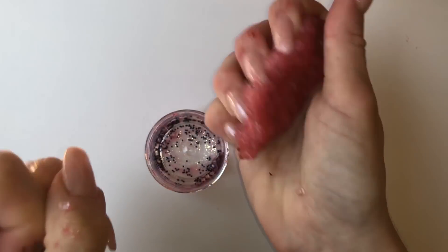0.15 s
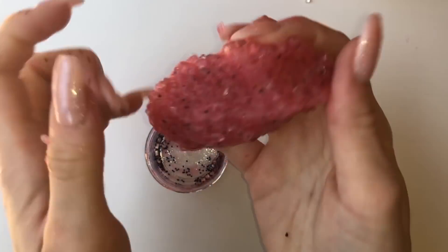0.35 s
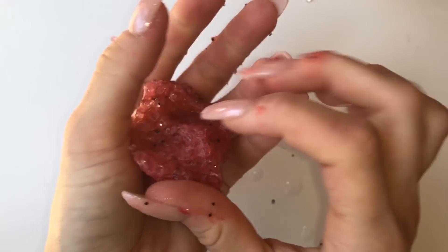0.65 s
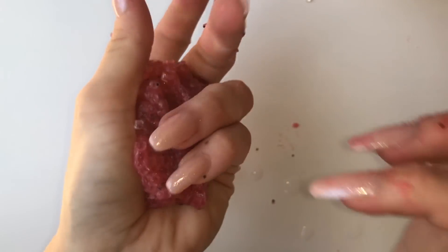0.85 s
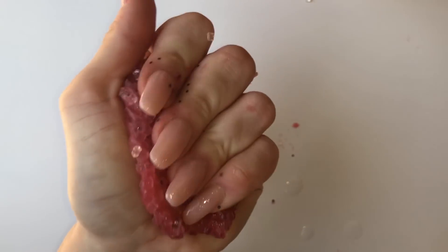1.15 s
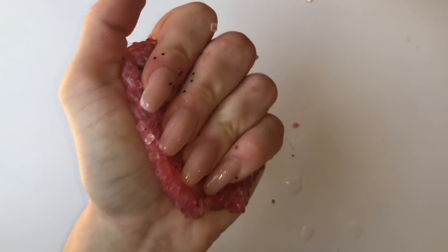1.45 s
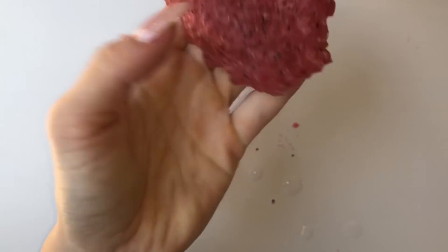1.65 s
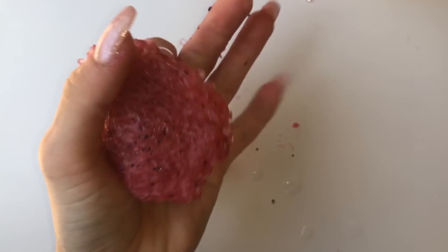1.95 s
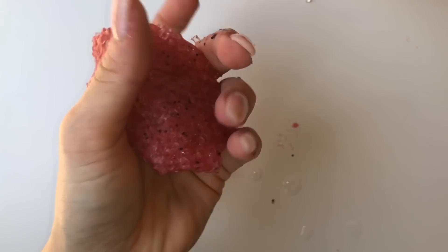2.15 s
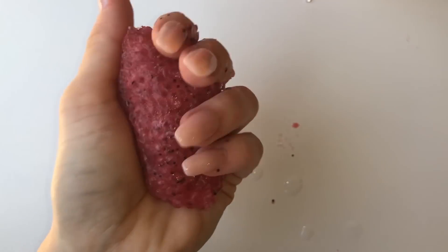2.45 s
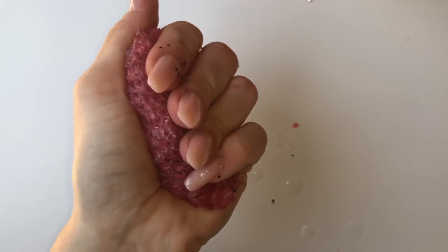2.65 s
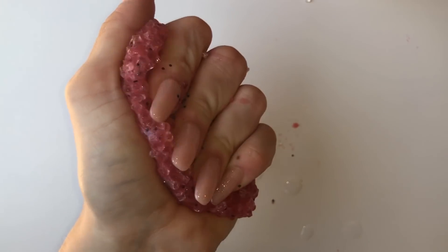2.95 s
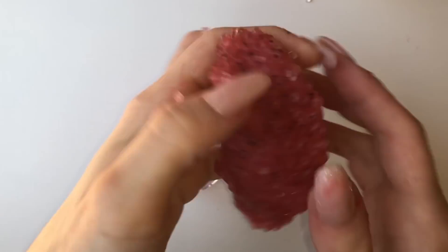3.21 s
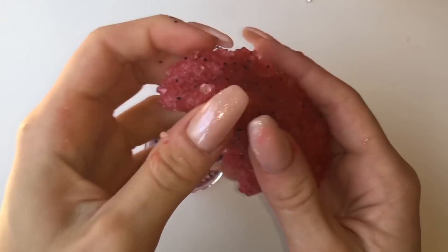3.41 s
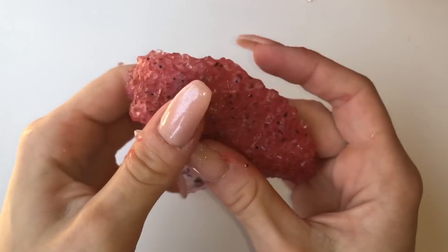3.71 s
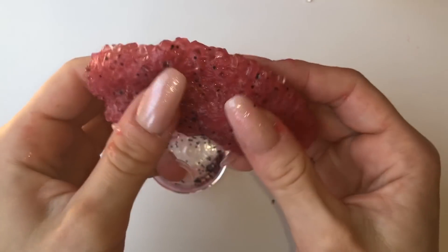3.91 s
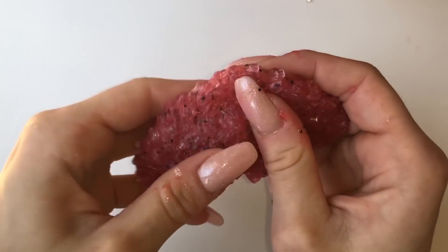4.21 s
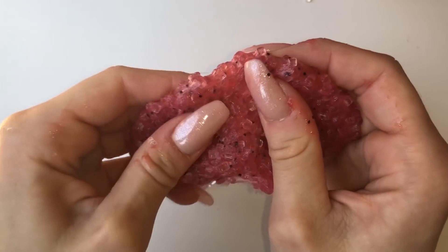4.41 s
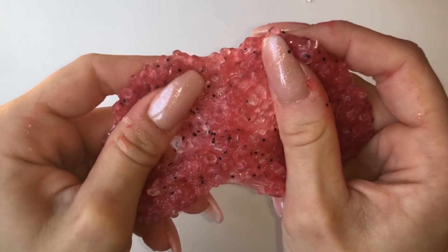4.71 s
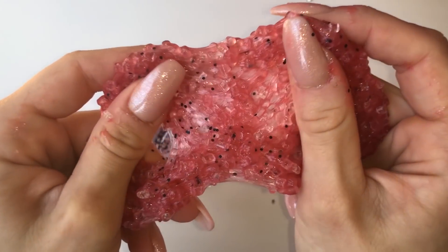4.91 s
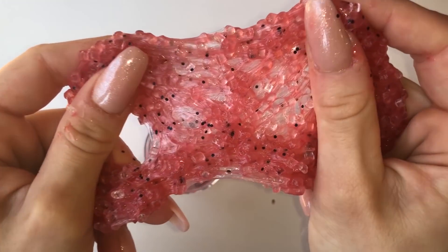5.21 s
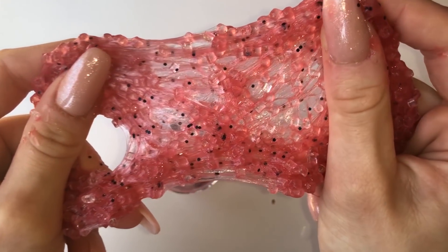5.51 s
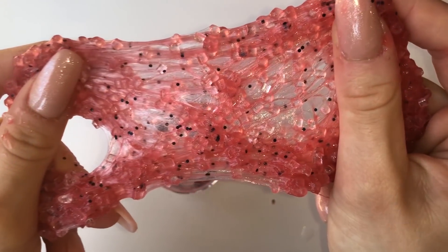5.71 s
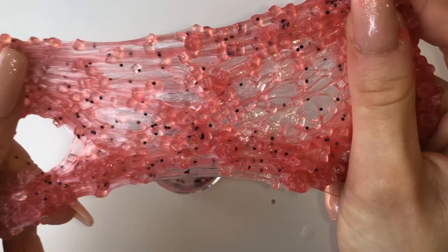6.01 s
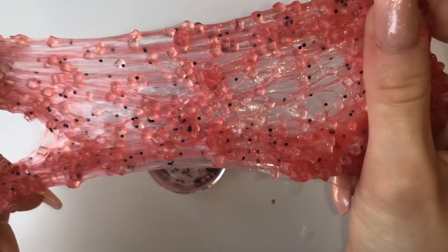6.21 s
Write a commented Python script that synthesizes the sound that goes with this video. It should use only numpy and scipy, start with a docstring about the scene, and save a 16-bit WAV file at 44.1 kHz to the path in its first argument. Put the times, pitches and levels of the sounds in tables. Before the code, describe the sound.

Close-up bead slime in a quiet room with slight short echoes. At the start a squeeze gives sharp bright pops and crackle; at 0.26 s the slime tears off the palm in a loud sticky fizz. Scattered snaps follow around 0.5-0.95 s, then a dense firm squeeze from 1.0 to 1.5 s, full of crisp pops. At 1.64 s it peels with a wet squelch and fizz, with smaller peels at 1.9-2.3 s. A softer squeeze crackles from 2.5 to 3.1 s, topped by a very loud pop with a dull thud at 3.04 s. Sticky rips come at 3.2 s, then light handling. From 4.4 to 4.8 s stretching surges in crackles and pops, thinning to sparse ticks until 6.4 s. Very faintly outside, a songbird whistles from 1.8 s on, a dove coos around 3 and 6 s, and a low drone swells near 5.5-6.4 s over soft air and hum.

```python
"""In a quiet room a hand squeezes, peels and stretches slime full of small beads, heard from close by.
Trapped air bursts in pops, faint to very loud (ringing cavities); a sticky crackle of countless tiny breaks
thickens to a tearing fizz when the palm lets go. Short zips and wet, sliding squelches lie between.
The room adds soft air noise, a wavering hum and a few echoes. Very faintly outside, a songbird whistles,
a dove coos and a low drone swells: gliding tones, the birds with echoes from a yard."""
import sys
import numpy as np
from scipy import signal
from scipy.fft import rfft, irfft
from scipy.io import wavfile
from scipy.ndimage import uniform_filter1d

SR = 44100
rng = np.random.default_rng(int(sys.argv[2]) if len(sys.argv) > 2 else 0)


def inscribe(sig):
    """Save sig as 16-bit PCM at rate SR to the path in sys.argv[1].

    A 1-D sig is mono; a 2-D sig holds one channel per row.
    Samples are clipped to [-1, 1] before scaling.
    """
    pcm = np.round(np.clip(np.atleast_2d(sig).T, -1, 1) * 32767)
    wavfile.write(sys.argv[1], SR, pcm.astype(np.int16))


N = 280476  # length of the scene [samples]

EDGE_HZ = 16300  # upper end of the treble
LEAD_S = .0012  # how long the skin of a pocket tears before it bursts
REST_DB = -79  # fine crackle of slime that only lies in the hand
USUAL_DB = -55  # fine crackle of a firm squeeze, the reference for how hard the slime is worked


def gain_of(db):
    """Turns decibels into an amplitude factor."""
    return 10 ** (np.asarray(db) / 20)


def evened(x):
    """Scales a sound to an rms (average strength) of one."""
    return x / np.sqrt(np.mean(x ** 2) + 1e-20)


def read(points, hz):
    """Reads a table over frequency, with straight lines between its points on a logarithmic axis."""
    f, value = np.transpose(points)
    return np.interp(np.log(hz + 1), np.log(f), value)


def add(mix, s, sound):
    """Mixes a sound in at time s."""
    part = mix[max(round(s * SR), 0):][:len(sound)]
    part += sound[:len(part)]


def coloured(x, points):
    """Filters x with the tone colour given by a table."""
    gain = gain_of(read(points, np.fft.rfftfreq(N, 1 / SR)))
    return irfft(rfft(x) * gain, N)


def lowpassed(x, hz):
    """Weakens what lies above hz, with a gentle slope."""
    return signal.sosfilt(signal.butter(2, hz, fs=SR, output="sos"), x)


def resonance(f, hz, q):
    """Response of one damped resonance at the frequencies f; a high q rings long."""
    damping = 1j * f * hz / q
    return damping / (hz ** 2 - f ** 2 + damping)


def resonate(x, hz, width_hz):
    """A resonance that follows the curve hz: shift down to zero, smooth twice, shift back."""
    turn = np.exp(2j * np.pi * np.cumsum(hz) / SR)
    r = np.exp(-np.pi * width_hz / SR)
    smooth = signal.lfilter([1], np.poly([r, r]), x / turn)
    return (turn * smooth).real


def glides(rows, width_hz, pure, per_s, bend=1):
    """Notes that slide in pitch: a share of pure tone, the rest tiny impulses in a moving resonance."""
    out, pure = np.zeros(N), np.clip(pure, 0, 1)
    for s, length, first_hz, last_hz, db in rows:
        n = int(length * SR)
        # a bend below one moves fastest at the start
        hz = first_hz * (last_hz / first_hz) ** np.linspace(0, 1, n) ** bend
        impulses = (rng.standard_normal(2 * SR) * (rng.random(2 * SR) < per_s / SR))[:n]
        tone = evened(np.sin(2 * np.pi * np.cumsum(hz) / SR))
        rough = evened(resonate(impulses, hz, width_hz))
        note = pure * tone + (1 - pure) * rough
        add(out, s, gain_of(db) * evened(note * signal.windows.tukey(n, .5)))
    return out


def echoes(t60, start_s, length_s):
    """Sparse reflections of random sign, each band dying at its own speed; total energy one."""
    t = np.arange(int(length_s * SR)) / SR
    taps = rng.choice([-1., 1.], len(t)) * (rng.random(len(t)) < .1)
    hz, age, z = signal.stft(taps, SR, nperseg=256)
    fade = gain_of(-60 * age / read(t60, hz)[:, None])
    tail = signal.istft(z * fade, SR, nperseg=256)[1][:len(t)]
    tail *= t > start_s
    return tail / np.linalg.norm(tail)


def from_afar(x, t60, direct_db):
    """Distant calls arrive partly straight, partly as echoes from the yard."""
    return gain_of(direct_db) * x + signal.oaconvolve(x, echoes([(1000, t60)], 0, 1))[:N]


def room_tone(air_db=-62.5):
    """Soft air noise, and a hum that wavers because it is noise in a very narrow resonance."""
    # colour of the still air: (frequency [Hz], relative level [dB])
    air_colour = [(20, -63), (38, -6.5), (70, 1), (110, -0.5), (200, -4), (360, -11.5), (600, -13),
                  (1300, -20), (2500, -23.5), (4200, -20.5), (8000, -28.5), (16000, -32.5)]
    # hum: (frequency [Hz], width of the resonance, which is applied twice [Hz], level [dB])
    hums = [(100.6, 4.7, -69), (123.6, 8.5, -75.5)]
    f = np.fft.rfftfreq(N, 1 / SR)
    out = gain_of(air_db) * evened(coloured(rng.standard_normal(N), air_colour))
    for hz, width, db in hums:
        hum = irfft(rfft(rng.standard_normal(N)) * resonance(f, hz, hz / width) ** 2, N)
        out += gain_of(db) * evened(hum)
    return out


def far_drone():
    """A low drone far away swells for a while: part pure tone, part noise-like ringing."""
    # (time [s], length [s], first pitch [Hz], last pitch [Hz], level [dB])
    swells = [(5.4, 1.08, 116, 125.1, -67.5)]
    return glides(swells, width_hz=30, pure=.3, per_s=5000)


def coos(clear_hz=470, hoarse_hz=570, flutter_hz=62, swing_hz=48, jitter=0.22, size=300):
    """The low notes of the dove are clear; in the high, stressed ones the throat flutters and turns hoarse."""
    # (time [s], length [s], first pitch [Hz], last pitch [Hz], level before the yard [dB])
    coo_notes = [(2.83, 0.1, 446, 464, -77), (3.02, .21, 440, 478, -70.5), (3.25, 0.15, 622, 631, -65),
                 (3.45, 0.11, 675, 585, -64.5), (3.56, .16, 458, 437, -79), (5.62, 0.15, 432, 476, -76),
                 (5.84, 0.14, 446.7, 464, -68.5), (6.03, 0.14, 565, 622, -63), (6.25, 0.1, 610, 665, -63.5)]
    out = np.zeros(N)
    for s, length, first_hz, last_hz, db in coo_notes:
        n = int(length * SR)
        hoarse = np.interp(first_hz, [clear_hz, hoarse_hz], [0, 1])
        unsteady = evened(uniform_filter1d(rng.standard_normal(SR), size))[:n]
        flutter = np.sin(2 * np.pi * np.cumsum(flutter_hz * (1 + jitter * unsteady)) / SR)
        hz = np.geomspace(first_hz, last_hz, n)
        hz = hz + hoarse * swing_hz * flutter + swing_hz * jitter * unsteady
        note = np.sin(2 * np.pi * np.cumsum(hz) / SR) * signal.windows.tukey(n, .5)
        add(out, s, gain_of(db) * evened(note))
    return out


def whistles():
    """Each whistle of the songbird drops quickly and levels out; a wall across the yard repeats it."""
    # (time [s], length [s], first pitch [Hz], last pitch [Hz], level before the yard [dB])
    whistle_notes = [(1.79, 0.089, 3570, 3310, -67.5), (2.07, .07, 3760, 3420, -68),
                     (2.19, 0.043, 5200, 4700, -71), (2.21, .19, 4600, 3760, -64),
                     (2.40, 0.1, 4780, 3230, -65), (3.60, 0.16, 4040, 3360, -65.5),
                     (3.90, .19, 3540, 3450, -63.5), (4.87, .11, 4100, 3050, -67.5),
                     (5.09, 0.13, 4140, 3820, -66.5), (5.21, .17, 3665, 3150, -65),
                     (5.48, .09, 4530, 4010, -66), (5.52, 0.12, 3800, 3510, -70),
                     (5.72, 0.08, 4750, 4120, -68), (5.885, .12, 4790, 3120, -68),
                     (6.15, .18, 3840, 3365, -67.5)]
    # the wall: (delay [s], level [dB])
    delay_s, db = 0.052, -11.5
    song = glides(whistle_notes, width_hz=560, pure=.52, per_s=5000, bend=.65)
    out = song.copy()
    add(out, delay_s, gain_of(db) * song)
    return out


def squelches():
    """Wet folds whose hollow changes size under the fingers: impulses in a sliding resonance."""
    # (time [s], length [s], first pitch [Hz], last pitch [Hz], level [dB])
    folds = [(.52, 0.099, 855, 980, -67), (1.61, 0.12, 1150, 1060, -60.5), (1.61, 0.066, 3630, 2700, -51),
             (1.98, .08, 1190, 1030, -63.5), (2.15, 0.064, 2500, 2430, -62.5),
             (2.52, 0.22, 2180, 1430, -60.5), (2.68, 0.37, 1400, 980, -65.5), (3.75, 1.04, 1380, 1520, -68)]
    return glides(folds, width_hz=390, pure=0, per_s=420)


def burst(hz, q, low_hz, size=1024):
    """One cavity snaps open and rings briefly; being small, it radiates little bass. Energy one."""
    f = np.fft.rfftfreq(size, 1 / SR)
    bass_loss = (1j * f / (low_hz + 1j * f)) ** 2
    treble_loss = 1 + 1j * (f / EDGE_HZ) ** 20
    ring = irfft(resonance(f, hz, max(q, .3)) * bass_loss / treble_loss)
    return np.roll(ring, 8) / np.linalg.norm(ring)


def off_hands(sound, scatter_db=-12, delay_s=0.0006, fade_s=0.0032, size=400):
    """Palm, fingers and table scatter a burst within a few milliseconds, differently every time."""
    t = np.arange(size) / SR
    scatter = evened(rng.standard_normal(size) * np.exp(-t / fade_s) * (t > delay_s))
    path = scatter * gain_of(scatter_db) / np.sqrt(size)
    path[0] = 1  # the direct sound
    return signal.fftconvolve(sound, path)


def summed(moves):
    """Levels [dB] of fine crackle and deep pockets, summed over moves (shape, fine, deep, all in dB)."""
    shapes, fine, deep = zip(*moves)
    power = gain_of([fine, deep]) ** 2 @ gain_of(np.maximum(shapes, -100)) ** 2
    return 10 * np.log10(power)


def pressing(grip_db_per_s=171, let_go_db_per_s=259, stretch_deep_db=-5):
    """How hard the lump is squeezed or stretched; the grip builds steadily and lets go quickly."""
    # the fingers close and keep pressing:
    # (time of full grip [s], hold [s], fine crackle [dB], deep pockets [dB])
    squeezes = [(0.0, 0.084, -54, -58), (0.55, 0.06, -55, -62.5), (.85, .1, -60, -63.5),
                (0.976, .51, -54.5, -56), (2.59, 0.53, -57, -59.5)]
    # both hands pull the lump into a sheet, which yields and then thins: (time [s], fine crackle [dB])
    stretch = [(3.551, -73), (3.852, -71.5), (3.913, -63), (4.33, -65), (4.41, -54), (4.551, -47),
               (4.79, -54.5), (4.852, -60.5), (5.351, -62), (5.449, -68), (6.36, -67)]
    t = np.arange(N) / SR
    pull_s, pull_db = np.transpose(stretch)
    pull = np.interp(t, pull_s, pull_db, left=-np.inf)
    moves = [(np.zeros(N), REST_DB, -np.inf), (pull, 0, stretch_deep_db)]
    for s, hold, fine, deep in squeezes:
        closing = grip_db_per_s * (t - s)
        opening = let_go_db_per_s * (s + hold - t)
        moves.append((np.minimum(np.minimum(closing, opening), 0), fine, deep))
    return summed(moves)


def peeling(rise_db_per_s=385, hold_s=0.0092):
    """How fast the slime tears off the skin: a quick rise, a short hold, then a dying away."""
    # (time of the fastest tearing [s], fine crackle [dB], deep pockets [dB], dying away [dB per s]);
    # crackle() shifts both levels by its fine_db and deep_db
    peels = [(0.262, -37, -45, 195), (0.393, -56.5, -61, 225), (1.636, -40.5, -50, 120.5),
             (1.921, -56.5, -60, 402), (2.025, -48.5, -56.5, 229), (2.171, -57.5, -58.5, 300),
             (2.335, -62, -88, 152), (3.195, -47.5, -65, 203), (3.224, -45, -48.5, 90),
             (3.391, -56.5, -59, 125), (3.71, -62, -63, 206), (4.15, -58, -64, 114),
             (4.325, -58, -63, 247.5), (6.116, -62.5, -60.5, 131)]
    t = np.arange(N) / SR
    moves = []
    for s, fine, deep, dying in peels:
        rising = rise_db_per_s * (t - s + hold_s)
        falling = dying * (s + hold_s - t)
        moves.append((np.minimum(np.minimum(rising, falling), 0), fine, deep))
    return summed(moves)


def crackle(work_db, pockets_db, per_s, spread_db, clump_db, scatter_db, fine_db, deep_db,
            thickening=1.05, dull_hz=8000, dulling=0.26, split_hz=3200, soft_db=-1, soft_s=0.003,
            count=40, size=180):
    """Countless tiny bubbles and threads break; the harder the slime is worked, the closer they crowd."""
    # tone colour of the crackle: (frequency [Hz], relative level [dB])
    crackle_colour = [(100, -20), (220, 9.5), (550, -3.5), (950, 0.5), (1450, 0.5), (2000, -4.5),
                      (2650, -6.5), (3000, -4), (5600, -4), (11500, -10), (16000, -17)]
    # sharpness of the ring: (dullest bubble [Q], most ringing bubble [Q]), before large ones are damped
    grain_q = .8, 6
    # per_s holds for work at USUAL_DB
    rate = per_s * gain_of(thickening * (np.maximum(work_db, REST_DB) - USUAL_DB))
    # little avalanches: breaks close in time share a strength, for size samples on average
    avalanche = np.cumsum(rng.random(N) < 1 / size)
    size_db = clump_db * np.clip(rng.standard_normal(N), -2, 2)[avalanche]
    size_db += spread_db * np.minimum(rng.exponential(1, N), 3)
    happens = rng.choice([-1, 1], N) * (rng.random(N) < rate / SR)
    # more breaks are each made weaker, so that the level stays with work_db
    breaks = gain_of(size_db) * happens / np.sqrt(np.minimum(rate, SR))
    kind = rng.integers(0, count, N)
    grains = np.zeros(N)
    for k, hz in enumerate(np.geomspace(900, 15000, count)):
        sharpness = np.exp(rng.uniform(*np.log(grain_q)))
        sharpness *= min(1, hz / split_hz)  # large soft pockets hardly ring
        grain = off_hands(burst(hz, sharpness, 117), scatter_db=scatter_db) * np.sqrt(hz)
        grains += signal.oaconvolve(breaks * (kind == k), grain)[:N]
    grains = coloured(grains, crackle_colour)
    low = signal.sosfilt(signal.butter(3, split_hz, "low", fs=SR, output="sos"), grains)
    high = signal.sosfilt(signal.butter(3, split_hz, "high", fs=SR, output="sos"), grains)
    # deep pockets go on oozing for a few milliseconds after they break
    oozing = np.sqrt(signal.lfilter([1], [1, -np.exp(-1 / (soft_s * SR))], low ** 2))
    wet_band = signal.butter(2, [560, split_hz], "band", fs=SR, output="sos")
    wet = signal.sosfilt(wet_band, oozing * rng.standard_normal(N))
    deep = evened(evened(low) + gain_of(soft_db) * evened(wet))
    # gentle work breaks things softly: the top of the treble drops away
    body = signal.sosfiltfilt(signal.butter(2, min(dull_hz, EDGE_HZ), fs=SR, output="sos"), high)
    top_gain = gain_of(dulling * np.clip(work_db - USUAL_DB, -20, 0))
    fine = (body + (high - body) * top_gain) / np.std(high)
    return gain_of(work_db + fine_db) * fine + gain_of(pockets_db + deep_db) * deep


def zips(q=0.7, low_hz=2000):
    """A patch of slime unsticks in one tiny zip: dense snaps of its threads that fade within milliseconds."""
    # (time [s], energy before scattering off the hands [dB], pitch [Hz], length [s])
    patches = [(.5185, -26, 7440, 0.0031), (.767, -14.5, 10700, 0.0047), (1.908, -25.5, 6000, 0.012),
               (2.1755, -18.5, 10000, .002), (2.539, -14.5, 6900, 0.0016), (3.227, -11.5, 3520, 0.0081)]
    out = np.zeros(N)
    for s, db, hz, length in patches:
        fade = np.linspace(1, 0, int(length * SR))
        threads = fade * rng.standard_normal(SR)[:len(fade)]
        snaps = signal.fftconvolve(threads, burst(hz, q, low_hz))
        add(out, s, gain_of(db) * off_hands(snaps / np.linalg.norm(snaps)))
    return out


def pop(hz, q, low_hz=1200, rip_db=-5, top_ratio=2.16, lead_db=-19):
    """One air pocket: the skin rips for an instant, and the cavity rings."""
    ripped = off_hands(burst(hz, q, low_hz), scatter_db=rip_db, delay_s=0, fade_s=0.00018)
    # a wider pocket opens more slowly and lacks the highest treble
    ripped = lowpassed(ripped, min(top_ratio * hz, .45 * SR))
    # the skin starts to tear just before it gives way
    growing = np.linspace(0, 1, round(LEAD_S * SR))
    tear = np.diff(growing * rng.standard_normal(len(growing)), prepend=0)
    lead = gain_of(lead_db) * evened(tear) / np.sqrt(len(tear))
    whole = np.concatenate([lead, ripped / np.linalg.norm(ripped)])
    return off_hands(whole, scatter_db=-11, fade_s=0.0017)


def faint_pops(work_db, per_s=40, thickening=.7, level_db=-28, growth=0.98, spread_db=0.5,
               middle_hz=5600, spread_octaves=0.65, usual_q=3.2, count=200):
    """Further faint pockets burst, sooner and louder with the pressure, up to that of a firm squeeze."""
    pressure_db = np.minimum(work_db - USUAL_DB, 0)
    # strain adds up; each pocket bursts once it reaches the pocket's own limit
    strain = np.cumsum(per_s * gain_of(thickening * pressure_db)) / SR
    wait, strength, pitch, ring = rng.uniform(-1.1, 1, (count, 4)).T
    out = np.zeros(N)
    for k, at in enumerate(np.searchsorted(strain, np.arange(count) + 1 + wait)):
        if at < N:
            db = level_db + growth * pressure_db[at] + 2 * spread_db * strength[k]
            hz = middle_hz * 2 ** (2 * spread_octaves * pitch[k])
            add(out, at / SR, gain_of(db) * pop(hz, usual_q * np.exp(ring[k])))
    return out


def pops(thud_q=2):
    """Air pockets burst, from faint to very loud; two bursts also have a dull thud."""
    # (time [s], energy before the last scattering [dB], pitch of the cavity [Hz],
    #  sharpness of its ring [Q], at least 0.3 in burst())
    pockets = [(0.014, -16, 9000, 0.26), (0.0203, -21.5, 3720, 0.88), (.025, -11, 4740, .17),
               (0.0602, -13.5, 13400, .73), (.088, -17, 6060, 3.2), (0.1154, -20.5, 3520, 1.9),
               (.1565, -23.5, 12100, .26), (0.2054, -22, 7200, 0.97), (0.235, -11.5, 10500, 0.55),
               (0.4772, -35, 7000, 1.4), (0.5915, -26.5, 6900, 2.1), (.6696, -14, 12200, 7.4),
               (0.656, -29, 6800, 8), (.683, -18, 6600, 0.97), (0.705, -32, 7100, 4),
               (.7384, -25, 2850, 10), (.8152, -9, 7500, 0.61), (.9107, -26, 7260, 2.2),
               (0.922, -22.5, 7500, 0.8), (0.9496, -23, 9800, 1.7), (0.9915, -16.5, 5500, 0.65),
               (0.9976, -14, 12170, 2.8), (1.0137, -11, 5500, 1.2), (1.037, -17, 7400, 0.95),
               (1.057, -18, 12400, 2.2), (1.081, -14, 5900, 0.24), (1.1287, -12, 9200, 1.2),
               (1.146, -23, 6000, .8), (1.1683, -19.5, 3240, 0.68), (1.186, -9.5, 12300, 2.2),
               (1.1916, -16.5, 9300, .71), (1.2122, -20, 4600, 2.7), (1.2327, -23, 4400, 1.5),
               (1.2543, -7, 8850, 0.81), (1.2886, -20, 5960, 0.89), (1.3278, -17.5, 9700, 0.4),
               (1.3615, -24.5, 4500, 5.5), (1.4292, -19, 5330, 1.2), (1.442, -25, 11000, 1),
               (1.4724, -5.5, 11500, 0.37), (1.488, -25, 8500, .91), (1.5171, -26.5, 14000, 0.55),
               (1.833, -20.5, 12600, 1.1), (1.88, -27.5, 9700, 0.87), (2.1276, -32, 6740, 2.4),
               (2.505, -28, 8460, 1.8), (2.534, -33, 8000, 0.92), (2.5511, -19.5, 8800, 3.6),
               (2.6259, -18, 10120, 4.2), (2.6502, -20.5, 12000, 0.71), (2.6762, -19.5, 6530, 3.4),
               (2.7028, -25.5, 5700, .5), (2.8021, -18.5, 7560, 2.7), (2.9207, -24, 13900, 2.4),
               (3.006, -13.5, 7000, 0.25), (3.012, -11.5, 4600, 2.4), (3.0398, 5, 4850, 0.57),
               (3.042, -13, 9000, 0.35), (3.1335, -19, 10800, 1.9), (3.2095, -15.5, 6600, 3.7),
               (3.354, -22, 8100, 2), (3.712, -23.5, 5300, 0.71), (3.8189, -31, 5860, 1.48),
               (4.1503, -17, 11500, 0.45), (4.2519, -29.5, 5040, 1.1), (4.3194, -21, 6040, 0.87),
               (4.371, -22, 6200, 1.5), (4.394, -19.5, 6550, 1.4), (4.4197, -18, 9000, 1.1),
               (4.432, -10, 7800, 1.6), (4.451, -16.5, 8700, 0.86), (4.5245, -19, 6100, 2.1),
               (4.5631, -6.5, 5950, 1.6), (4.661, -17.5, 5700, 2.5), (4.7337, -19.5, 5800, 3.2),
               (4.9087, -29, 9000, 2.1), (4.961, -28, 7400, 0.64), (5.01, -24, 8870, 0.65),
               (5.095, -23.5, 5900, 5.8), (5.1368, -13, 6960, 0.2), (5.4805, -31.5, 6400, 4.5),
               (5.666, -29.5, 8200, 6.7), (5.716, -34, 8350, 6.5), (5.9574, -30.5, 5310, 0.73),
               (6.2858, -29.5, 11900, 0.97)]
    # thuds: (time [s], energy [dB], pitch [Hz])
    thuds = [(3.04, -30, 250), (3.0398, -8.5, 1330), (4.432, -23, 283)]
    out = np.zeros(N)
    for s, db, hz, q in pockets:
        add(out, s - LEAD_S, gain_of(db) * pop(hz, q))
    for s, db, hz in thuds:
        add(out, s, gain_of(db) * burst(hz, thud_q, hz / 2))
    return out


def scene(room_db=-16.5):
    """Close slime with a little of the room, and the distant birds and drone."""
    # ring of the room: (frequency [Hz], time to fall by 60 dB [s])
    room_ring = [(300, 0.28), (2000, 0.088), (6000, 0.13), (10000, 0.17), (15000, 0.12)]
    work_db, pockets_db = pressing()
    crunch = crackle(work_db, pockets_db, per_s=750, spread_db=3.5, clump_db=2.5, scatter_db=0.5,
                     fine_db=0.0, deep_db=0.0)
    fizz = crackle(*peeling(), per_s=1300, spread_db=4.5, clump_db=2.6, scatter_db=-1.0,
                   fine_db=0.5, deep_db=1.0)
    slime = pops() + zips() + faint_pops(work_db) + crunch + fizz + squelches()
    reflections = echoes(room_ring, start_s=0.0034, length_s=.5)
    room = gain_of(room_db) * signal.oaconvolve(slime, reflections)[:N]
    songbird = from_afar(whistles(), t60=.7, direct_db=-2)
    dove = from_afar(coos(), t60=.4, direct_db=-2)
    return (slime + room + songbird + dove + far_drone() + room_tone())[None]


def record(dry):
    """Rounds off the loudest peaks towards 0.85, then ends the treble at EDGE_HZ."""
    rounded = dry / (1 + (dry / .85) ** 6) ** (1 / 6)
    treble_end = signal.firwin(201, EDGE_HZ, window=("kaiser", 8), fs=SR)
    return signal.oaconvolve(rounded, treble_end[None], "same")


dry = scene()
out = record(dry)
inscribe(out)
```